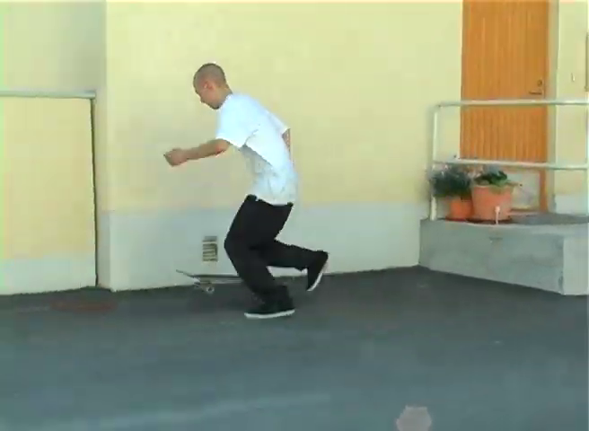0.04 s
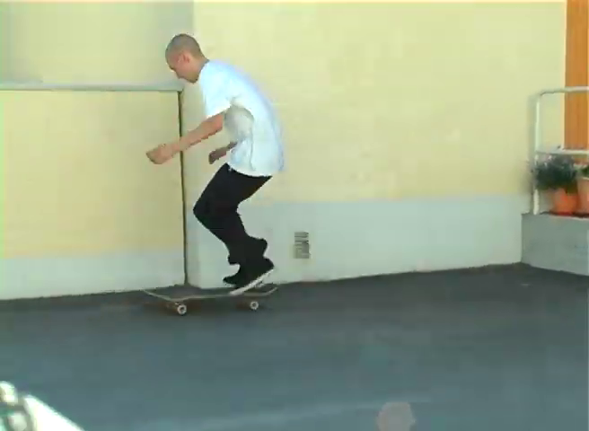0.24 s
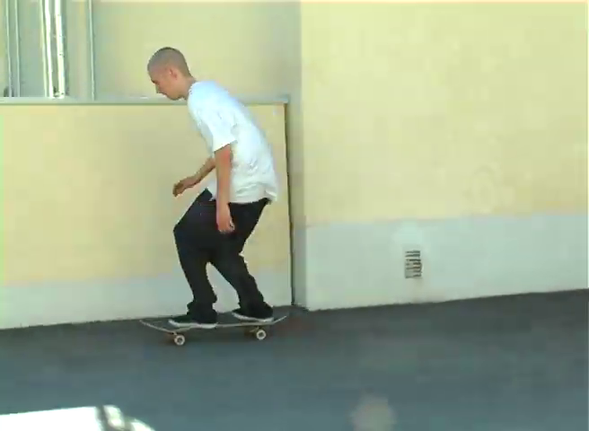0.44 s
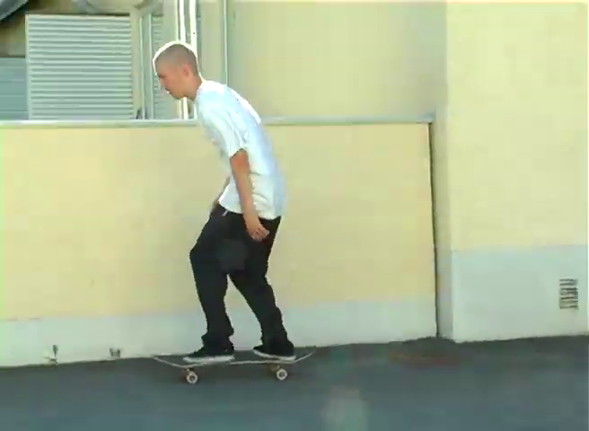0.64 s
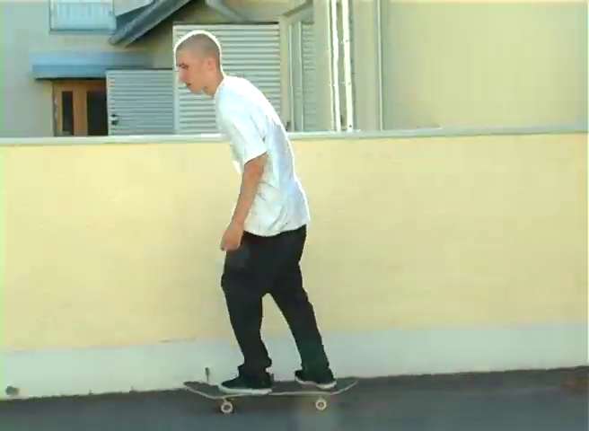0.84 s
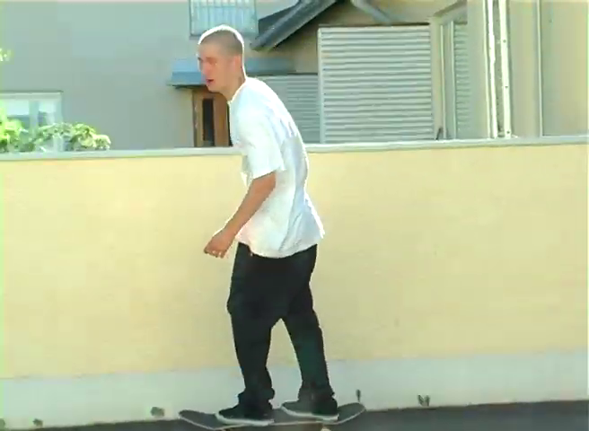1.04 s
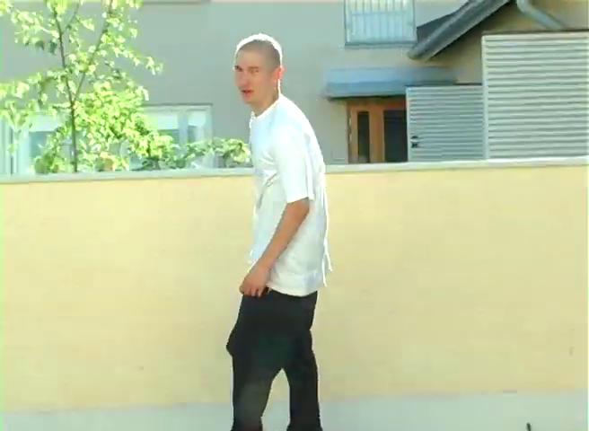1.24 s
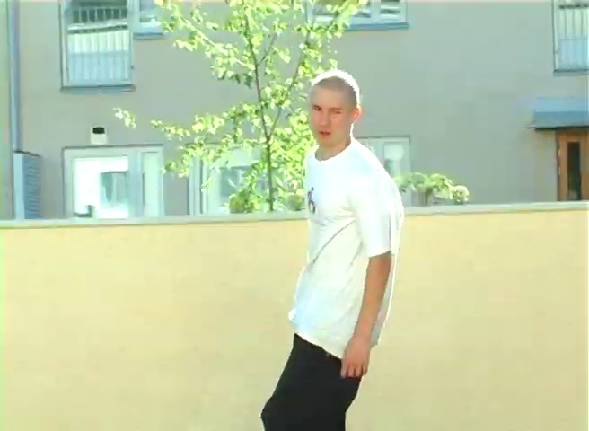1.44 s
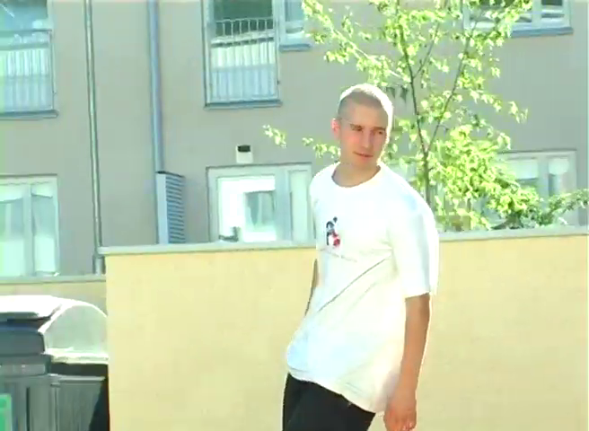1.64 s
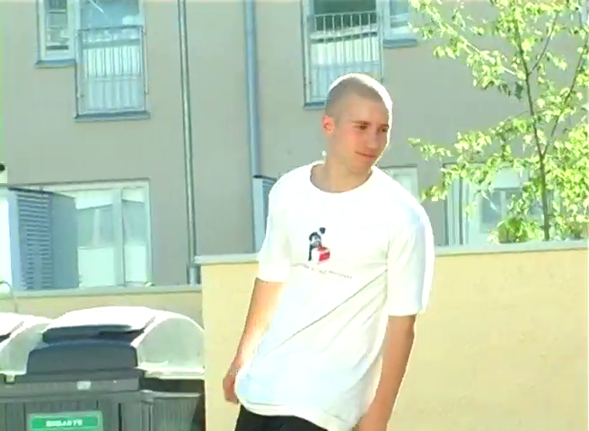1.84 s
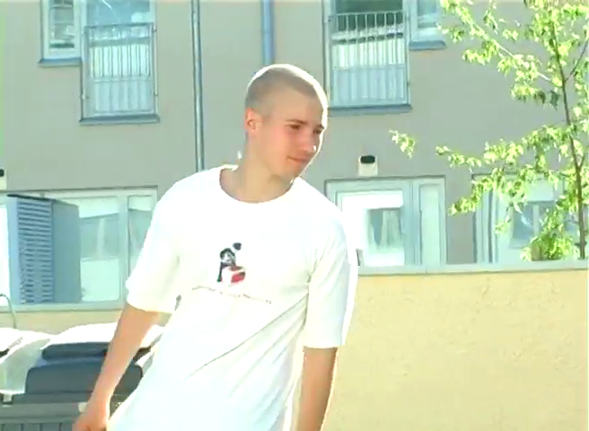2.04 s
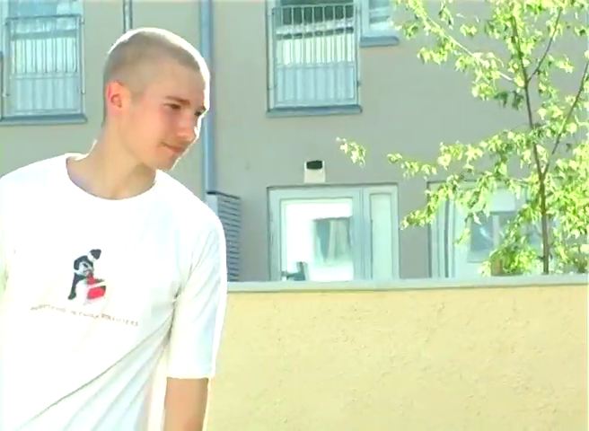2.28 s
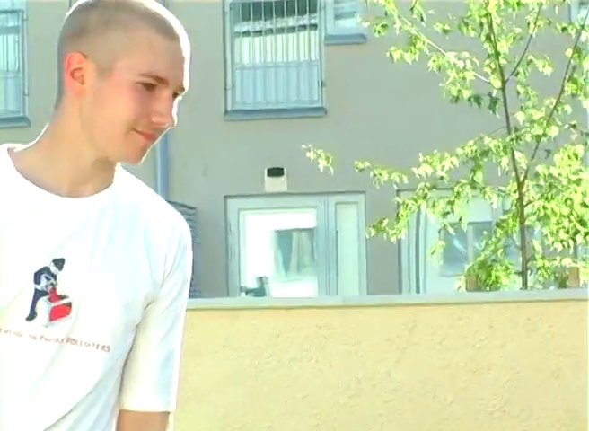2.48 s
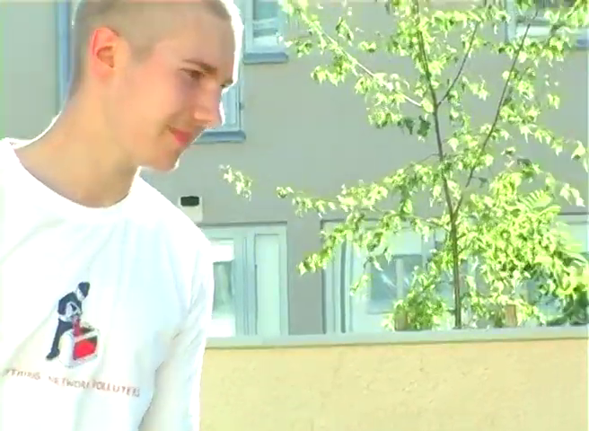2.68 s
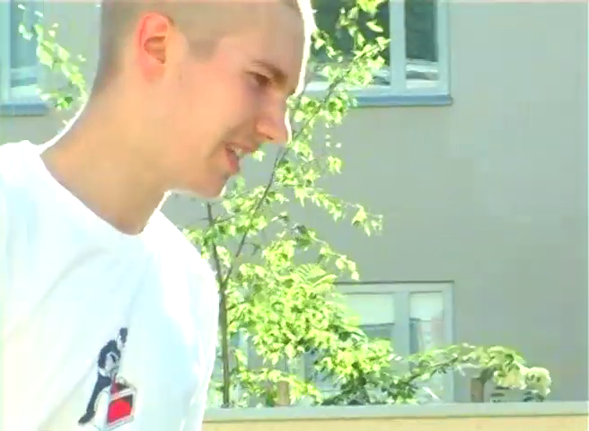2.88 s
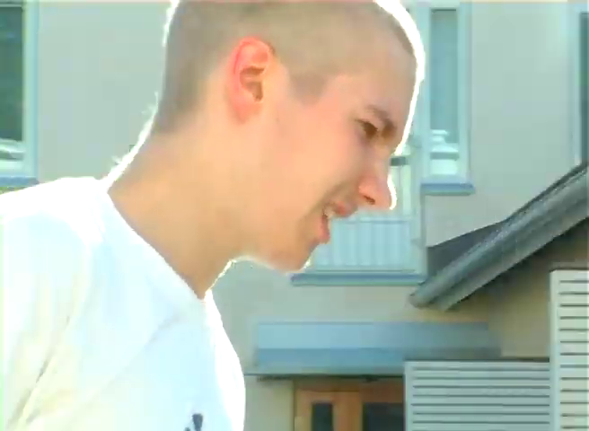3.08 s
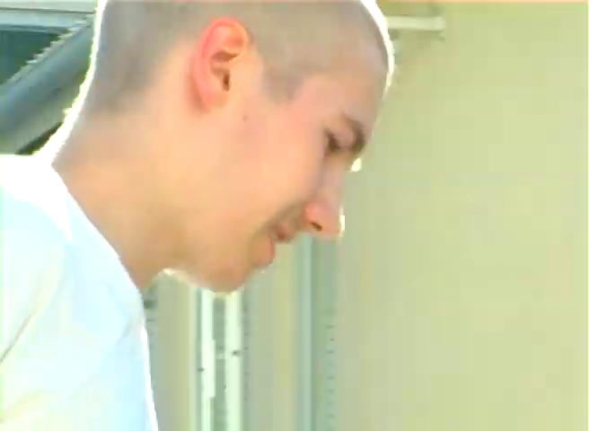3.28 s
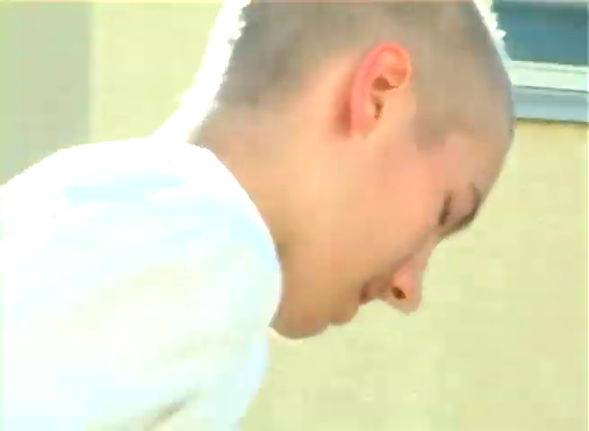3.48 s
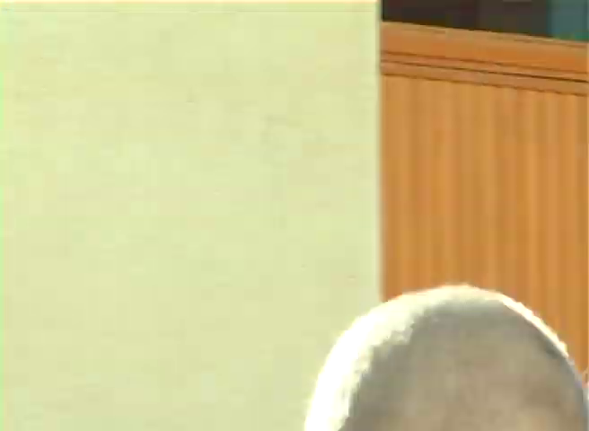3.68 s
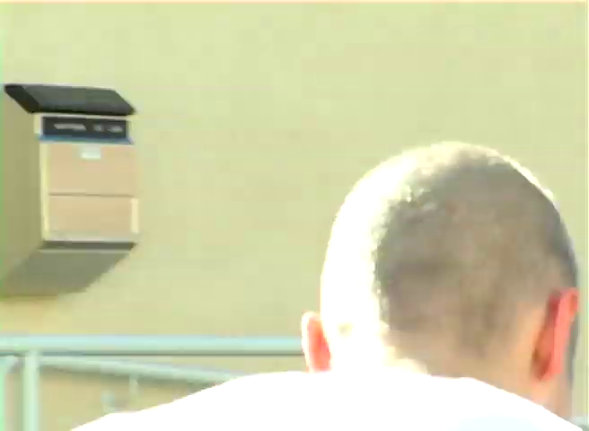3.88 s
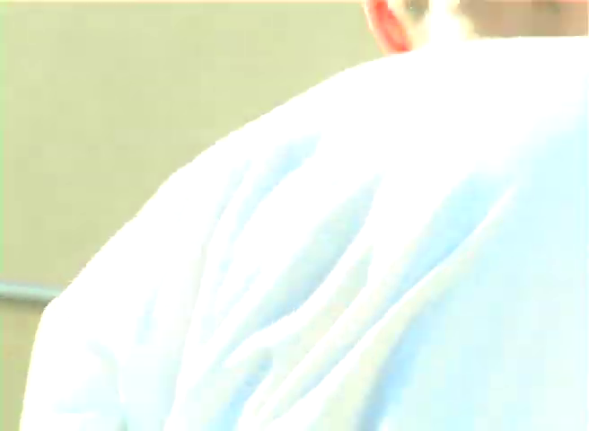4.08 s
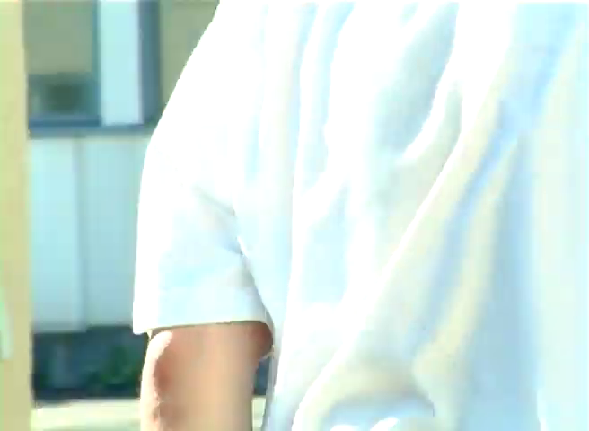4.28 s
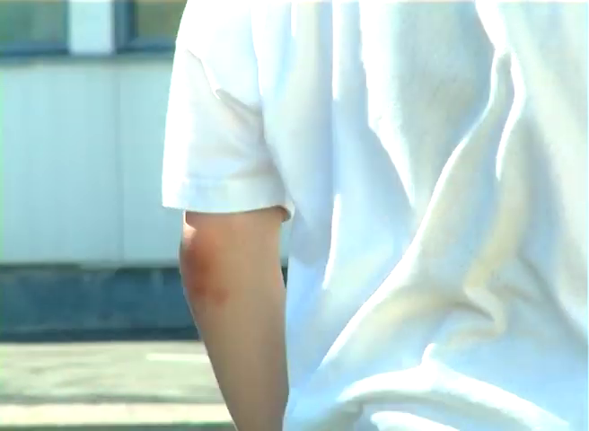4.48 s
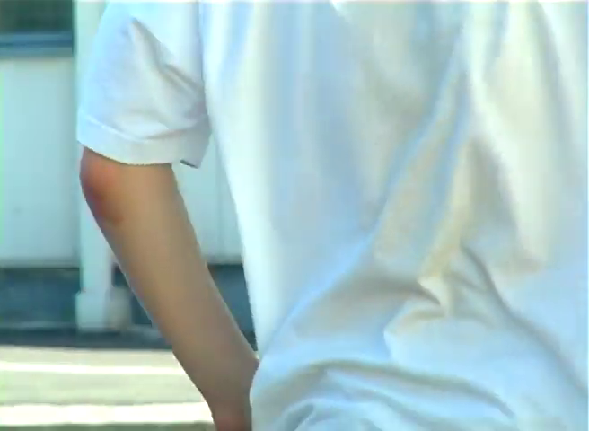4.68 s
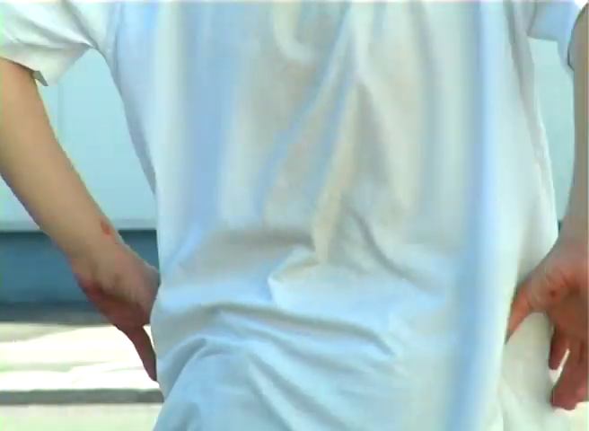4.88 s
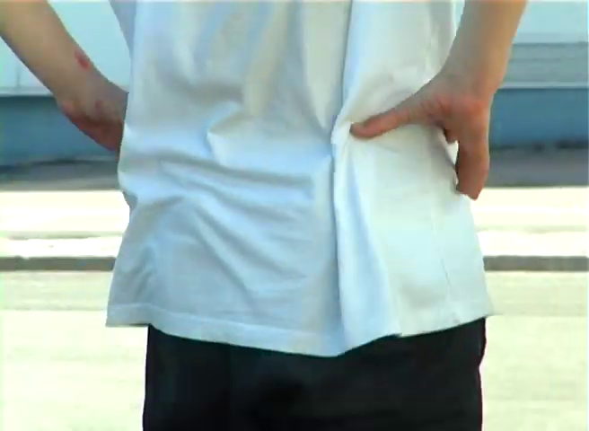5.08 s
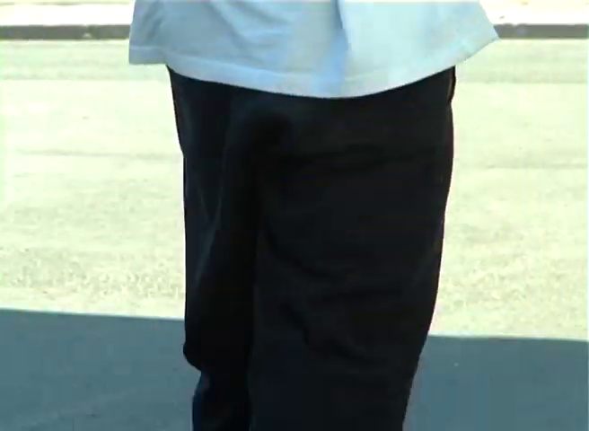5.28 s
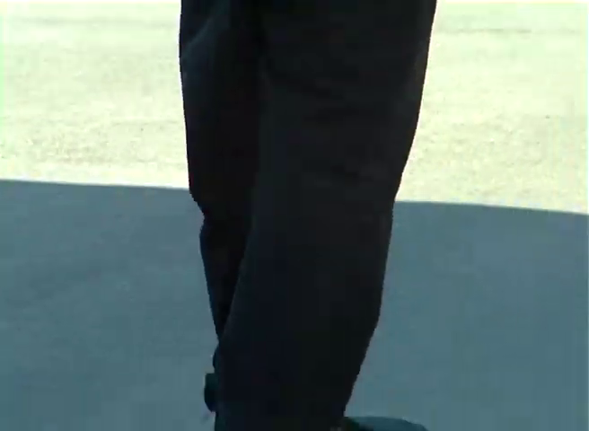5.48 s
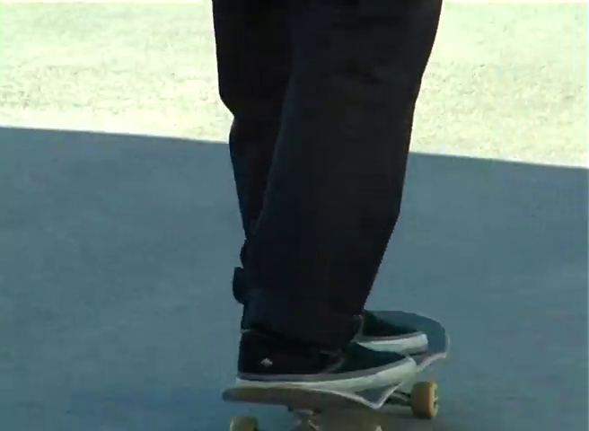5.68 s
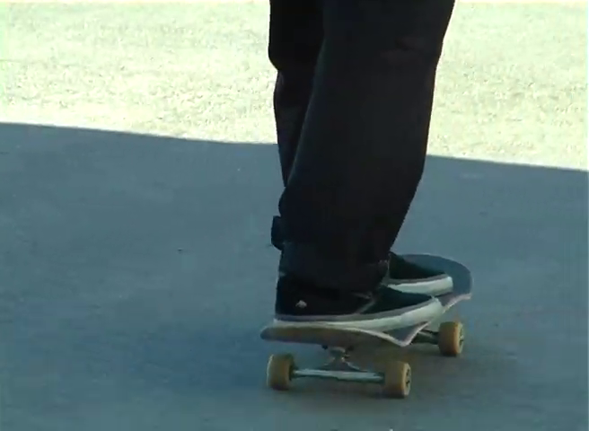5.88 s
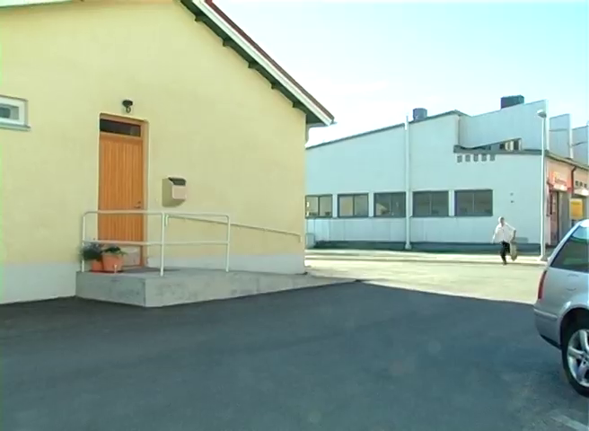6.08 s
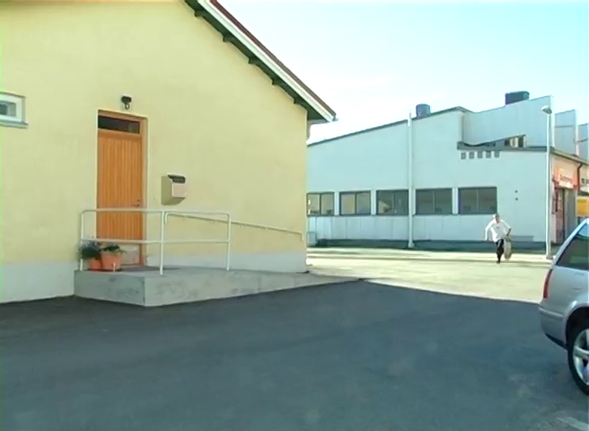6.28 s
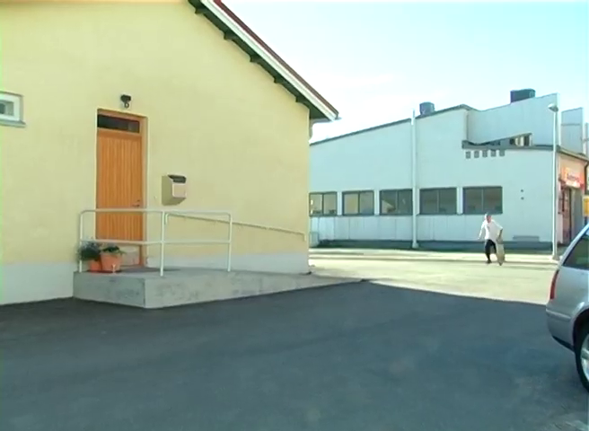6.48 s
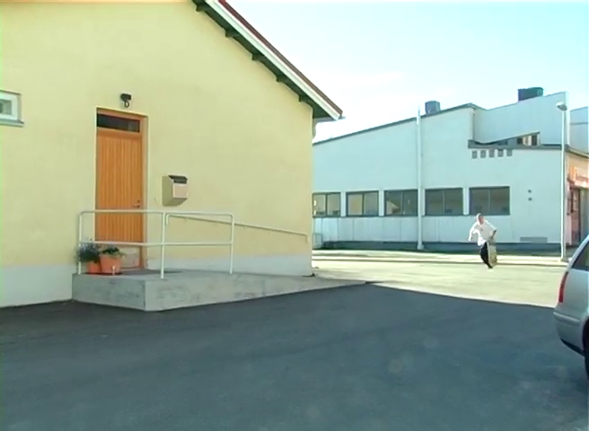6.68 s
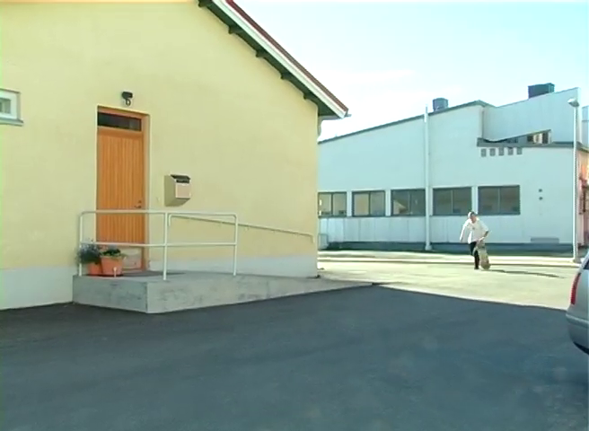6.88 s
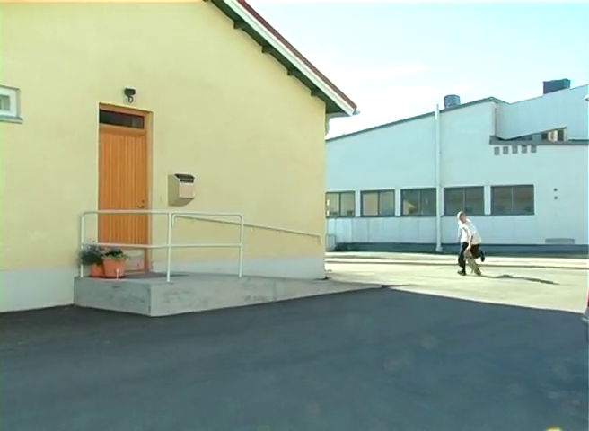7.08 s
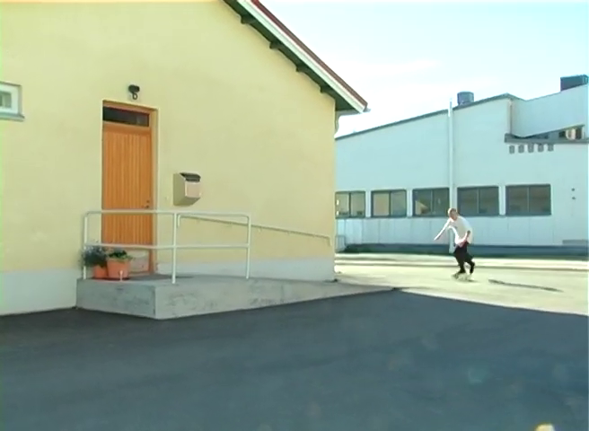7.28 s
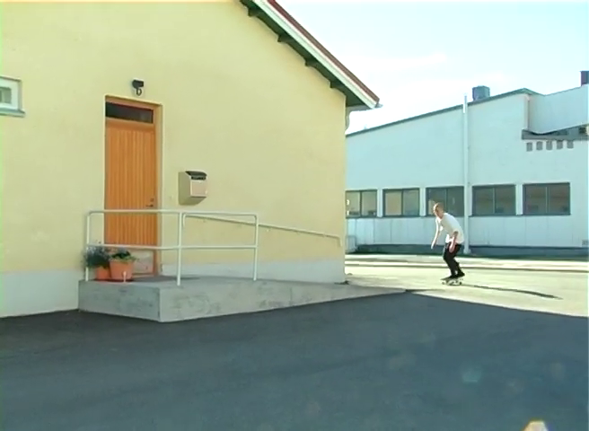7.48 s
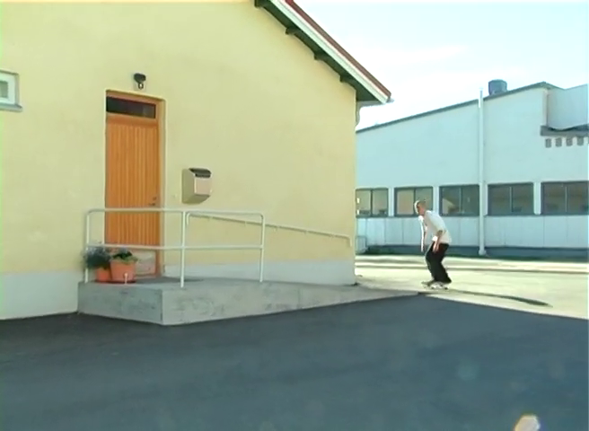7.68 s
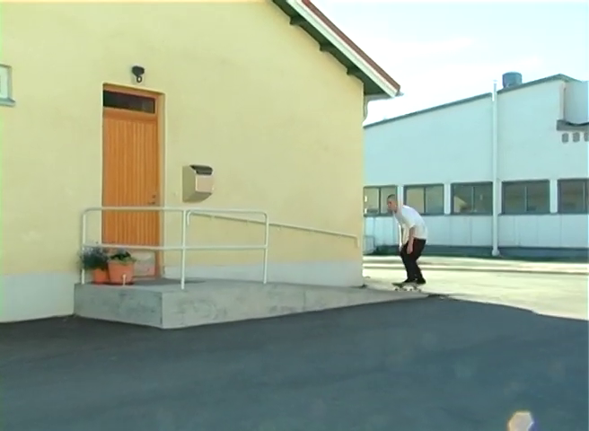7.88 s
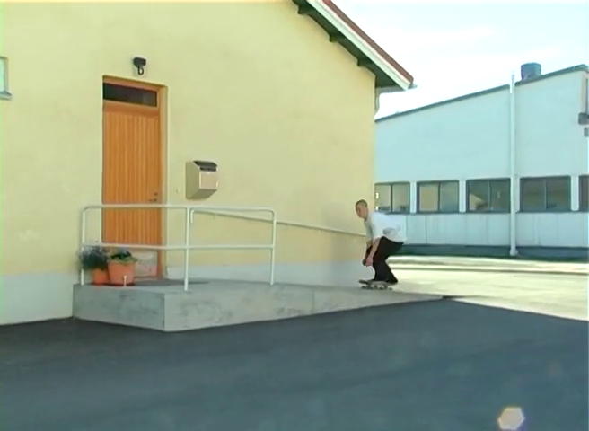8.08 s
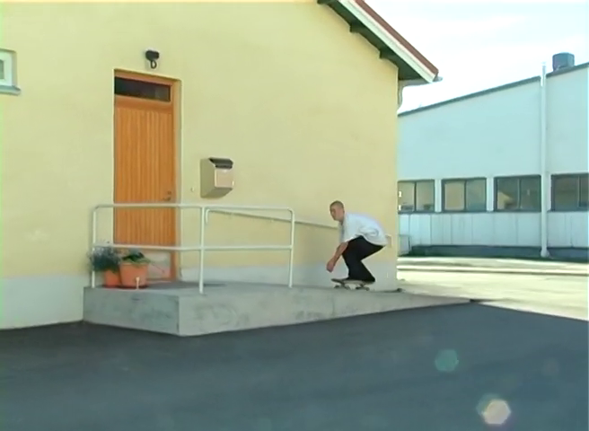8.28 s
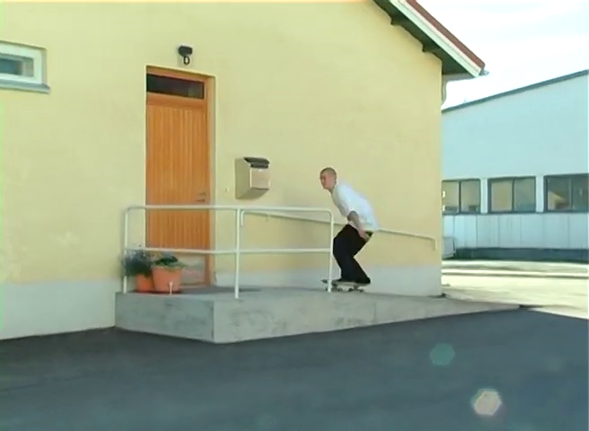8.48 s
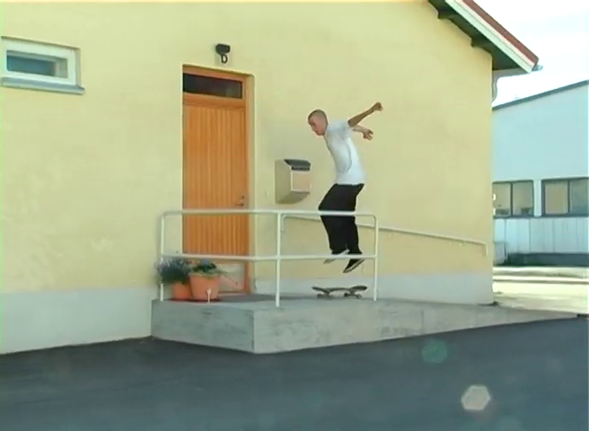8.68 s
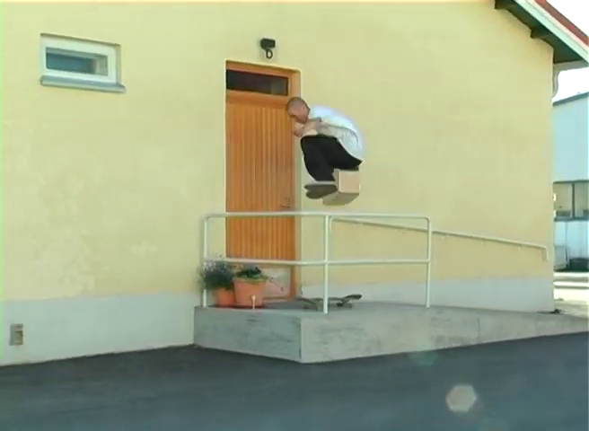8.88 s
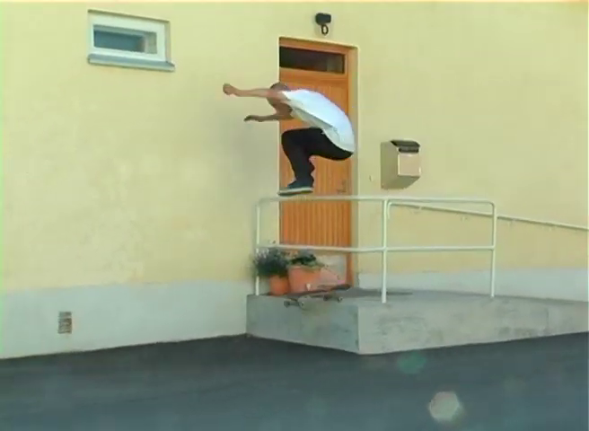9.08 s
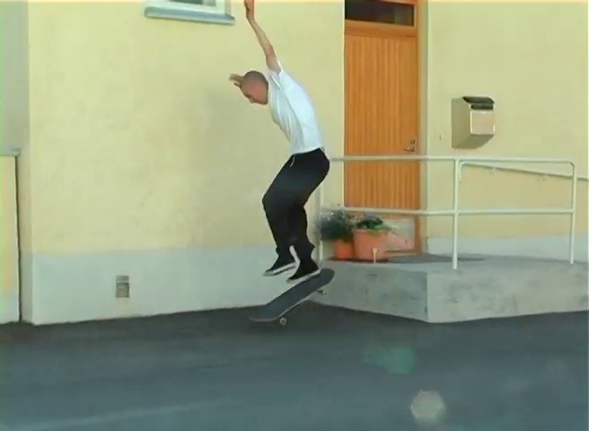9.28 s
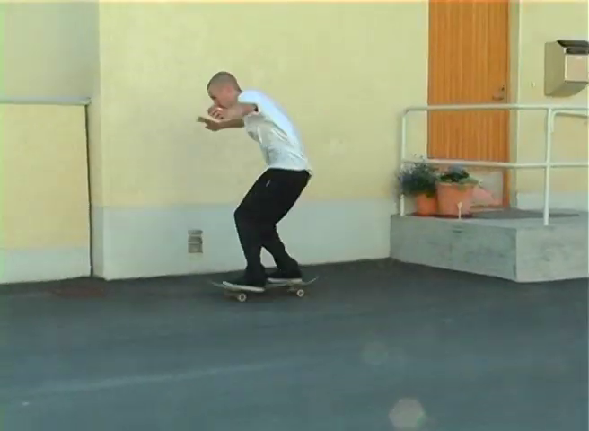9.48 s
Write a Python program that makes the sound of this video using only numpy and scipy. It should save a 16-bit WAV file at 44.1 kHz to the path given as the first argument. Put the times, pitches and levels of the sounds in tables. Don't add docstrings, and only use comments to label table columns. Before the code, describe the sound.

A skateboard clatters down and growls over rough asphalt, then after a cut to a quiet yard it rolls up, flies and slams down hard.

```python
import sys
import numpy as np
from scipy import signal
from scipy.fft import rfft, irfft, next_fast_len
from scipy.io import wavfile
from scipy.ndimage import uniform_filter1d, minimum_filter1d, map_coordinates

SR = 44100
rng = np.random.default_rng(int(sys.argv[2]) if len(sys.argv) > 2 else 0)


def waveform_to_disk(signal):
    frames = np.transpose(np.atleast_2d(signal))
    scaled = np.clip(frames, -1, 1) * 32767
    samples = np.round(scaled).astype(np.int16)
    wavfile.write(sys.argv[1], SR, samples)


def elevation(decibels):
    levels = np.asarray(decibels, float)
    return 10 ** (levels / 20)


N = 420713

CUT_S = 6.012
FAR_S = 7.62

# time in seconds, level in dB, grind of hard ground in dB,
# rider's weight in dB, deck pitch in Hz.
ROLL_NEAR = [(0, -34.5, 3, 8, 526), (0.15, -55, 2.5, 22, 510), (0.24, -42, 10, 3, 538),
             (0.56, -39.5, -1, 9, 514), (0.95, -38.5, 3.5, 1.5, 501), (1.45, -31.5, -1, -2.5, 520),
             (1.93, -34, 6.5, 2, 519), (2.5, -35, 6.5, 6, 540), (2.82, -34, 9, 6, 570),
             (3.22, -39, 6.5, 14, 592), (3.5, -30.5, -3.5, 0.5, 592), (3.62, -44, 16, 5, 575),
             (3.8, -29.5, 3, 2, 579), (4.1, -36, 11, 8.5, 542), (4.83, -37.5, 2.5, 8.5, 500),
             (5.3, -42, 7, 8.5, 533), (6.02, -42.5, 7, 7.5, 534)]
ROLL_FAR = [(7.384, -42.5, 2, 10, 533), (7.56, -38.5, 6.5, 6, 525), (7.91, -31.5, -2.5, -1.5, 502),
            (8.09, -35.5, -5, -1, 512), (8.69, -40.5, 2.5, 3, 510), (8.74, -49.5, 12, -8, 500),
            (9.1, -45.5, 10.5, -5, 570), (9.2, -50.5, 11.5, -16, 560), (9.25, -66, 19.5, 0, 510),
            (9.4, -70, 16, 10, 510), (9.46, -49, -8, 8, 560), (9.54, -41, 10, 15.5, 506)]
PART_DB = [-9.5, 0.08, -6.5, -16.5, -13]
PART_GRIND = [0.009, .01, 0.24, 1.1, 0.88]
PART_WEIGHT = [0.99, .01, 0.3, .01, .01]
TURN_DB_PER_HZ = [0.027, 0.011, -0.089, 0.0093, .001]

# start in seconds, peak in dB, hardness in dB, length in seconds.
LANDINGS = [(0.066, -41.5, 15.5, 0.021), (0.157, -25, 8, 0.08), (0.183, -21, 4.5, 0.078),
            (0.195, -27.5, 3.5, 0.079), (0.235, -29, 0, 0.026), (0.276, -34, 4, 0.08),
            (0.329, -22, 1.5, 0.059), (0.399, -9.5, -9.5, 0.041), (0.407, -19, 1.5, 0.054),
            (3.631, -26, -1, 0.036), (3.655, -19, -3, 0.032), (3.713, -15, 1.5, .03),
            (3.8, -21, 3.5, 0.036), (6.674, -44, -6.5, .036), (7.184, -31, 14, 0.055),
            (7.262, -35.5, 17.5, 0.046), (7.385, -20.5, 4, 0.049), (7.387, -21, -4.5, 0.16),
            (9.362, -33, 1, 0.082), (9.379, -11, 4, 0.034), (9.389, -18, 3, 0.06), (9.408, -7, 10, 0.017),
            (9.413, -15.5, 4, 0.03), (9.418, -16.5, -7, .03), (9.429, -12, 2, 0.013),
            (9.462, -18.5, -18, 0.13), (9.514, -18, -11, 0.052)]
LANDING_DB = [-7, -10, -14, -13.5]
# start in seconds, peak in dB, length in seconds.
THUDS = [
    (0.399, -22, 0.047),
    (3.036, -16.5, 0.015),
    (3.189, -17.5, 0.022),
    (3.271, -17, 0.02),
    (3.31, -23, 0.026),
    (3.799, -20, 0.03),
    (9.408, -7.5, 0.071),
    (9.47, -22, 0.033),
    (9.515, -23, 0.031),
]
# start in seconds, peak in dB, hardness in dB.
CRACKS = [(0.506, -31, -1), (0.591, -23.5, -24), (0.751, -30.5, 0), (1.214, -27, -12), (2.393, -30, 5.5),
          (2.653, -25.5, -4), (2.912, -36.5, 14.5), (3.039, -17.5, -2.5), (3.196, -28, 1.5),
          (3.264, -26, -3), (3.314, -17.5, -10.5), (3.46, -25, -25), (3.503, -19.5, -9), (3.995, -27.5, 7),
          (4.22, -27.5, 4), (4.809, -35, 2), (5.615, -31, 3), (5.63, -27.5, 4), (5.77, -32, 3),
          (5.783, -23, -4.5), (5.884, -40, 6), (5.899, -25, 1.5), (7.528, -26, -3.5), (7.727, -34, 5),
          (7.955, -34, 7), (7.977, -24, 3.5), (8.053, -27, 5), (8.797, -35, 5), (9.1, -32, -12)]
CRACK_DB = [-7, -9, -16, -13.5]
# start in seconds, peak in dB.
PEBBLES = [(0.592, -38), (0.637, -29), (1.309, -29.5), (1.708, -36), (2.516, -23.5), (3.344, -53),
           (4.976, -39), (5.301, -37), (5.387, -42), (5.414, -33.5), (8.759, -51), (8.826, -44),
           (8.99, -52), (9.135, -40), (9.181, -43)]
PEBBLE_DB = [-8, -5.5, -22.5, -4]
HARD_REACH = np.array([[.01], [.7], [1.2], [.9]])
FAR_DULL_DB = np.array([[-.5], [.01], [1.5], [-5]])
# start in seconds, peak in dB, length in seconds.
KNOCKS = [(0.184, -23, 0.016), (0.33, -30, 0.028), (0.399, -7.5, 0.026), (3.039, -15.5, 0.017),
          (3.652, -20, .02), (3.713, -13.5, 0.017), (5.783, -26, 0.013), (5.9, -27, .015),
          (7.389, -20.5, 0.043), (9.383, -13, 0.018), (9.39, -10.5, .02), (9.407, -8, 0.013),
          (9.413, -5, .015), (9.423, -14, 0.012), (0.751, -32, .01), (3.266, -29, .015), (7.728, -30, .015)]
# start in seconds, peak in dB, length in seconds.
SLAPS = [(3.714, -18, 0.063), (3.727, -27.5, 0.034), (6.95, -48, 0.03), (7.1845, -20, 0.047),
         (7.1896, -24, 0.022), (7.2609, -28, 0.028), (7.383, -21.5, 0.028), (9.362, -28, 0.017),
         (9.38, -12.5, 0.033), (9.407, -13, 0.048), (9.4679, -21.5, 0.03)]

# resonance in Hz, width in Hz, level in dB.
SLACK_BOOM = [(209.5, 35.5, 1), (251.4, 97, -0.5)]
# resonance in Hz, width in Hz, level in dB.
TENSE_BOOM = [(112, 44, -4), (175, 42.4, 1.5), (232, 29, -2.5)]
# resonance in Hz, width in Hz, level in dB.
SLACK_DECK = [(411, 115, -4.5), (510, 70.7, 1.5), (570, 44, -3.5)]
# resonance in Hz, width in Hz, level in dB.
TENSE_DECK = [(546, 83, -5.5), (647.4, 34.5, 4), (732, 97, -6.5)]
# resonance in Hz, width in Hz, level in dB.
SLACK_WHEELS = [(977.5, 104, 13.5), (1387, 94, -0.5), (1471, 63, 2.5), (2005, 130, -9.5)]
# resonance in Hz, width in Hz, level in dB.
TENSE_WHEELS = [(1080, 160, 4), (1333.5, 62, 8), (1520, 147, 0.5), (2020, 82, -2.5)]
# resonance in Hz, width in Hz, level in dB.
SLACK_AXLES = [(2366, 600, 0), (2655, 324, 5), (2860, 300, 3.5), (3385, 250, 5.5), (3970, 230, -6)]
# resonance in Hz, width in Hz, level in dB.
TENSE_AXLES = [(2550, 83, -13), (2620, 230, 3), (3340, 330, -8), (3660, 310, 8.5), (4390, 810, 2.5)]
# resonance in Hz, width in Hz, level in dB.
BEARINGS = [(6034, 690, 1), (8560, 970, -6), (10140, 890, -10), (12360, 1040, -9), (13800, 1300, -12.5)]
# resonance in Hz, width in Hz, level in dB.
BARE_WOOD = [(1650, 220, 0), (2020, 190, 2.5), (2290, 170, 5), (2550, 490, -1.5), (2910, 280, -1.5),
             (3430, 256, -2.5), (3830, 550, -9.5)]
# resonance in Hz, width in Hz, level in dB.
DECK_MAIN = [(530, 75, 0)]

# frequency in Hz, width in Hz, depth from 0 to 1.
HOUSING = [(4730, 2000, 0.22), (10930, 2500, 0.6)]
# frequency in Hz, seconds to fall by 60 dB.
WALLS = [(150, 1), (1000, 0.58), (4000, 0.36), (12000, 0.31)]
# frequency in Hz, level in dB per Hz.
TOWN = [(20, -64), (66, -9.5), (144, -17), (218, -10), (300, -16.5), (480, -18.5), (800, -22), (1500, -31),
        (2500, -38.5), (3600, -43), (4200, -50), (6000, -51.5), (10000, -54), (15000, -52)]
# frequency in Hz, likeness from 0 to 1.
ALIKE = [(60, 1), (500, 0.98), (1500, 0.88), (3000, 0.95), (5000, 0.68), (9000, 0.85), (15000, 0.54)]
# frequency in Hz, left minus right in dB.
LEAN = [(60, -2.5), (240, -2.0), (950, -2), (3770, -1), (15000, -3.5)]


def unit(x):
    return x / np.sqrt(np.mean(x ** 2) + 1e-20)


def along(points, hz):
    f, v = np.transpose(points)
    return np.interp(np.log(hz + 1), np.log(f + 1), v)


def wobble(rate):
    knots = rng.standard_normal(int(N * rate / SR) + 4)
    return map_coordinates(knots, [np.arange(N) * rate / SR])


def filtered(x, response):
    m = next_fast_len(N + SR // 2)
    hz = np.fft.rfftfreq(m, 1 / SR)
    return irfft(rfft(x, m) * response(hz), m)[..., :N]


def grit(rate, spread_db, jolt_s):
    hit = rng.random(N) < rate / SR
    stones = hit * elevation(spread_db * rng.standard_normal(N))
    return unit(signal.lfilter([1], [1, -np.exp(-1 / (jolt_s * SR))], stones))


def rolling():
    t = np.arange(N) / SR
    s, *controls = np.transpose(ROLL_NEAR + ROLL_FAR)
    level_db, grind_db, weight_db, pitch = [np.interp(t, s, c) for c in controls]
    on = (t < CUT_S) | (t >= ROLL_FAR[0][0])
    part_db = level_db + np.c_[PART_DB]
    part_db = part_db + np.outer(PART_GRIND, grind_db) + np.outer(PART_WEIGHT, weight_db)
    part_db = part_db + np.outer(TURN_DB_PER_HZ, np.maximum(pitch - 560, 0))
    force = on * elevation(part_db)
    stones = grit(100, spread_db=3.5, jolt_s=.003)
    feel = np.array([[.1], [.15], [.2], [.3], [.35]])
    surface = elevation(0.74 * wobble(14) + 1.14 * np.array([wobble(25) for _ in feel]))
    shake = surface * (1 + feel * stones) * rng.standard_normal(force.shape)
    trim = elevation([[1.5], [1.5], [1.5], [-1.5], [-1.5]])
    return force * [unit(row) for row in shake] * trim, (pitch, grind_db)


def burst(count, t, length, push):
    sizes = np.repeat(rng.standard_normal(len(t) // 90 + 1), 90)[:len(t)]
    contacts = elevation(2.5 * sizes - 1)
    rattle = rng.standard_normal((count, len(t))) * contacts * elevation(-60 * (t / length) ** 1.91)
    return rattle + push * elevation(-60 * t / 0.00033)


def strikes(table, push):
    force, t = np.zeros(N + SR), np.arange(SR // 5) / SR
    for s, db, length in table:
        force[round(s * SR):][:len(t)] += elevation(db - 8.5) * burst(1, t, max(length, .005), push)[0]
    return force[:N]


def blows():
    force, t = np.zeros((4, N + SR)), np.arange(SR // 5) / SR
    last = np.array([[.9], [.95], [.85], [.7]])
    push = np.array([[9], [5], [2.5], [1.5]])
    reach, dull_db = np.c_[HARD_REACH], np.c_[FAR_DULL_DB]
    crack_s, pebble_s = 0.042, 0.023
    hits = [(s, db + np.c_[LANDING_DB] + reach * hard, length) for s, db, hard, length in LANDINGS]
    hits += [(s, db + np.c_[CRACK_DB] + reach * hard, crack_s) for s, db, hard in CRACKS]
    hits += [(s, db + np.c_[PEBBLE_DB], pebble_s) for s, db in PEBBLES]
    for s, levels, length in hits:
        start = round(s * SR)
        gain = elevation(levels + dull_db * (CUT_S < s < FAR_S))
        force[:, start:start + len(t)] += gain * burst(4, t, last * max(length, .005), push)
    thuds = strikes(THUDS, push=5.2)
    slaps, knocks = strikes(SLAPS, push=4), strikes(KNOCKS, push=7.8)
    return np.vstack([thuds, force[:, :N], slaps, knocks])


def body(modes, hz):
    shape = 0
    for k, (c, w, db) in enumerate(modes):
        shape = shape + (-1) ** k * elevation(db) * 1j * hz * w / (c * c - hz * hz + 1j * hz * w)
    shape *= (1j * hz / (1j * hz + .7 * modes[0][0])) ** 2
    return shape / np.sqrt(np.mean(abs(shape) ** 2))


def tension(pitch_hz, slack_hz, range_hz):
    turn = np.clip((pitch_hz - slack_hz) / range_hz, 0, 1) * np.pi / 2
    return np.cos(turn), np.sin(turn)


def housing(hz):
    return np.prod([1 - np.clip(depth, 0, 1) / (1 + 2j * (hz - c) / w) for c, w, depth in HOUSING], axis=0)


def board(forces, pitch, grind_db):
    boom, deck, wheels, axles, bearings, bare, main_mode = forces
    bend_hz = pitch - 500
    load = tension(pitch, slack_hz=461.8, range_hz=208)
    squeeze = tension(0.56 * bend_hz + 2.5 * grind_db, slack_hz=0, range_hz=179)
    twist = tension(2.7 * bend_hz + 8 * grind_db, slack_hz=0, range_hz=500)
    pushes = [bearings, bare, main_mode]
    for part, shares in ((boom, load), (deck, load), (wheels, squeeze), (axles, twist)):
        pushes += [part * share for share in shares]
    parts = [BEARINGS, BARE_WOOD, DECK_MAIN, SLACK_BOOM, TENSE_BOOM, SLACK_DECK, TENSE_DECK,
             SLACK_WHEELS, TENSE_WHEELS, SLACK_AXLES, TENSE_AXLES]
    m = next_fast_len(N + SR // 8)
    hz = np.fft.rfftfreq(m, 1 / SR)
    ringing = sum(rfft(push, m) * body(modes, hz) for push, modes in zip(pushes, parts))
    return irfft(housing(hz) * ringing, m)[:, :N]


def spread(a, b):
    turn = lambda hz: np.arccos(np.clip(along(ALIKE, hz), -1, 1)) / 2
    mid, side = filtered(np.array([a, b]), lambda hz: np.array([np.cos(turn(hz)), np.sin(turn(hz))]))
    return np.array([mid + side, mid - side])


def walls(x):
    hz, t, z = signal.stft(rng.standard_normal((2, SR // 2)), SR, nperseg=256)
    fade = elevation(-60 * t / along(WALLS, hz)[:, None])
    tail = signal.istft(z * fade, SR, nperseg=256)[1]
    late = np.pad(x, (400, 0))[None]
    wet = signal.fftconvolve(late, tail / np.linalg.norm(tail[0]), axes=1)[:, :N]
    clock = np.arange(N) / SR
    return spread(*wet) * ((clock < CUT_S) | (clock > CUT_S + .6))


def town():
    far = unit(filtered(rng.standard_normal((2, N)), lambda hz: elevation(along(TOWN, hz))))
    low = unit(filtered(rng.standard_normal((2, N)), lambda hz: hz ** 2 / (1 + (hz / 55) ** 5)))
    near_street_db = 5 * (np.arange(N) / SR < CUT_S)
    low *= elevation(-57.5 + near_street_db - 0.5 * wobble(.8) + 1.8 * wobble(4.5))
    return spread(*(elevation(-49.5 + 0.93 * wobble(3.37)) * far + low))


def whistle():
    tone = np.sqrt(2) * elevation(-72.5) * np.sin(2 * np.pi * 15625 * np.arange(N) / SR)
    return tone * elevation([[1.5], [-1.5]])


def distance(x):
    t, nearing_s = np.arange(N) / SR, 0.4
    far = (t > CUT_S) * np.clip((FAR_S + nearing_s - t) / (2 * nearing_s), 0, 1)
    dull = filtered(x, lambda hz: 1 / (1 + 1j * hz / 12100) ** 2)
    return x + far * (dull - x)


def scene():
    (roll, strain), force = rolling(), blows()
    force[:5] += roll
    paths = np.array([np.ones(N), np.sign(rng.standard_normal(N))])
    direct, scattered = distance(board(force[:, None] * paths, *strain))
    return spread(direct, scattered) + elevation(-16.5) * walls(direct) + town()


def gain_control(x, knee, late_s, hold_s):
    peak = -minimum_filter1d(-abs(x).max(axis=0), size=round(hold_s * SR))
    peak = np.pad(peak, (round((late_s + hold_s / 2) * SR), 0))[:N]
    return x * uniform_filter1d((1 + (peak / knee) ** 4) ** -.2, size=200)


def top_cut(x):
    return signal.sosfilt(signal.butter(12, 16500, fs=SR, output="sos"), x)


def record(dry):
    gap_hz = 300
    off = lambda hz: (hz + gap_hz / 2) % gap_hz - gap_hz / 2
    gaps = lambda hz: 1 - .65 * (hz > 450) / (1 + 1j * off(hz) / 9)
    balance = lambda hz: elevation(along(LEAN, hz) * np.array([[.5], [-.5]]))
    x = gain_control(dry, knee=1.0, late_s=0.032, hold_s=0.066)
    x = x / (1 + abs(x / .75) ** 4) ** (1 / 4)
    x = filtered(x, lambda hz: balance(hz) * gaps(hz) * (hz < 15750))
    return top_cut(x + whistle())


dry = scene()
out = record(dry)
waveform_to_disk(out)
```